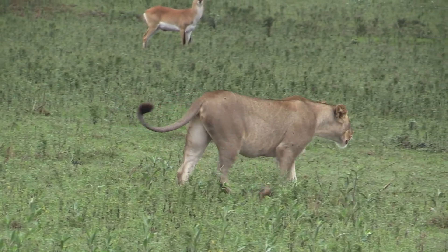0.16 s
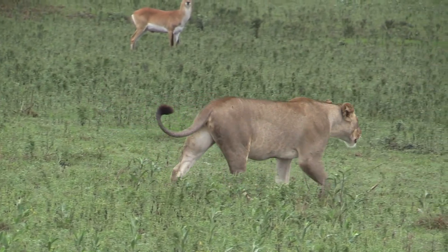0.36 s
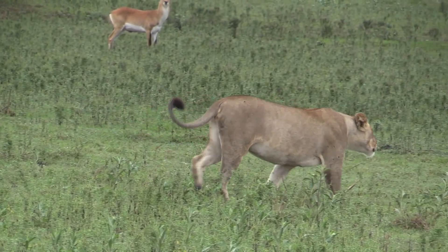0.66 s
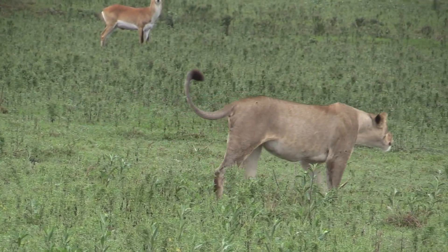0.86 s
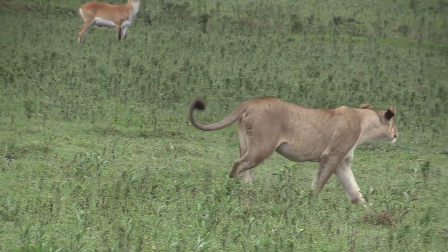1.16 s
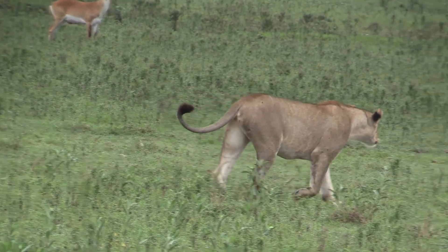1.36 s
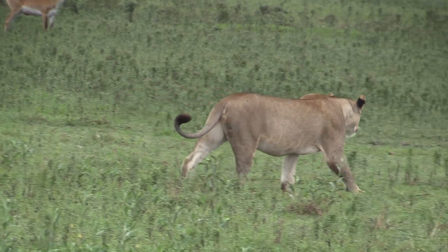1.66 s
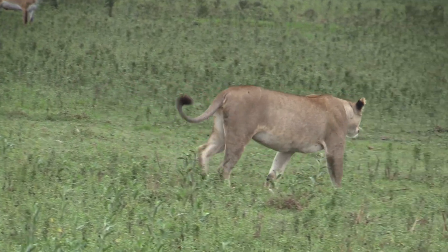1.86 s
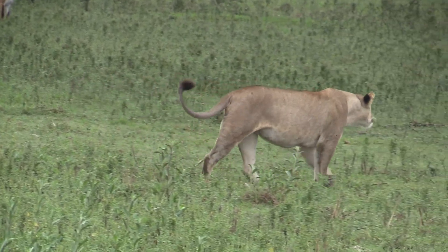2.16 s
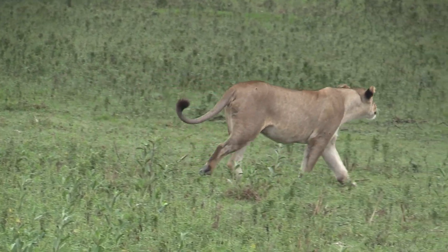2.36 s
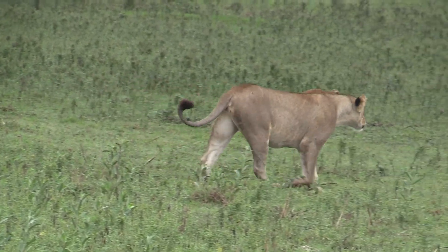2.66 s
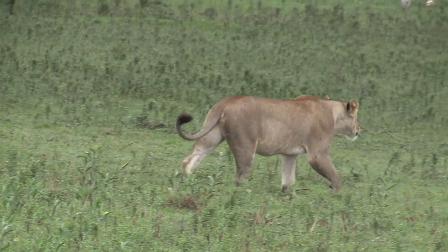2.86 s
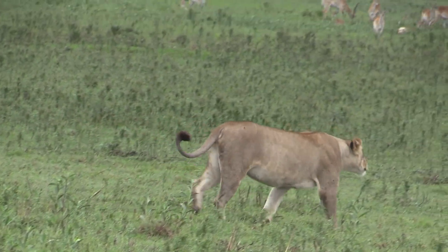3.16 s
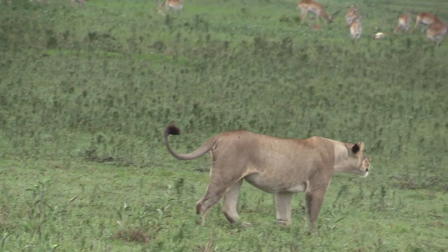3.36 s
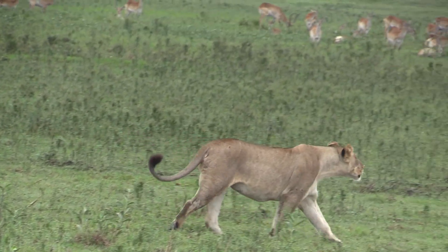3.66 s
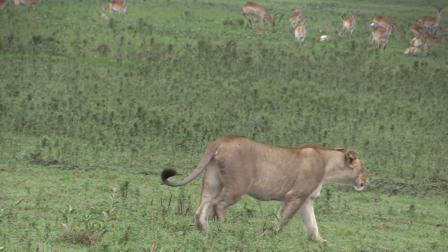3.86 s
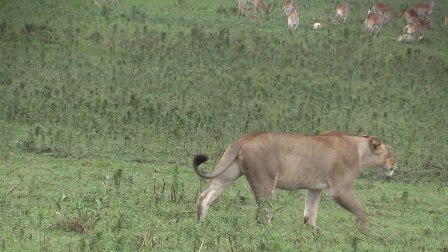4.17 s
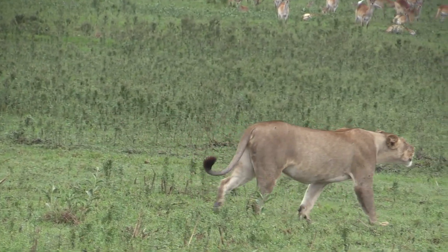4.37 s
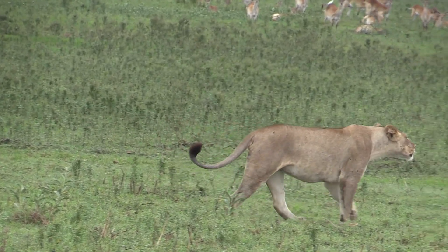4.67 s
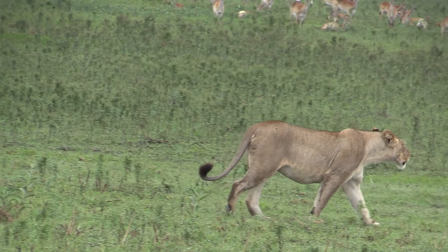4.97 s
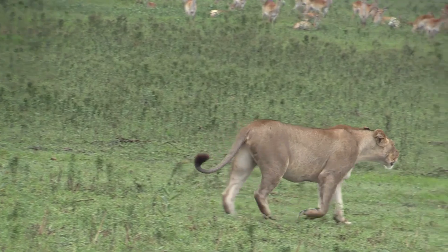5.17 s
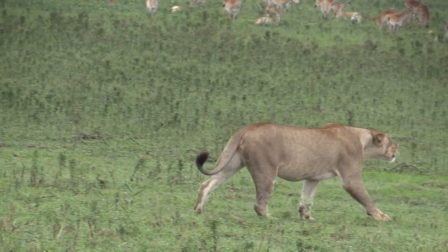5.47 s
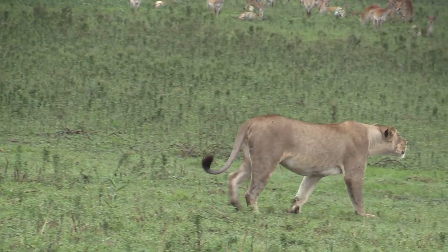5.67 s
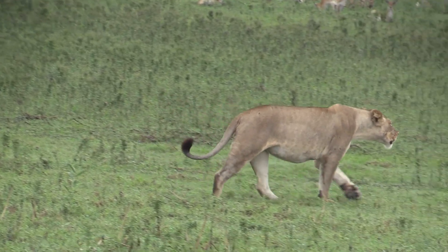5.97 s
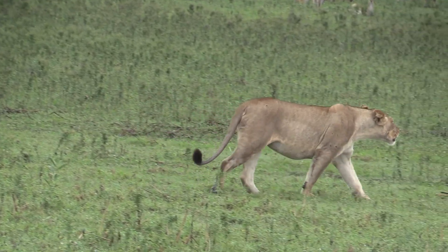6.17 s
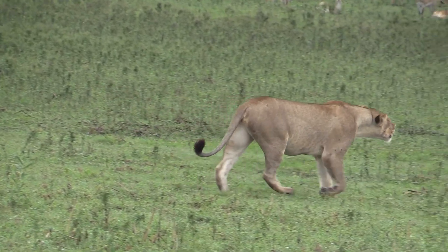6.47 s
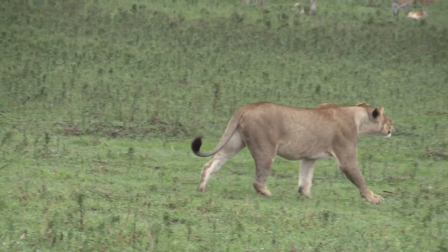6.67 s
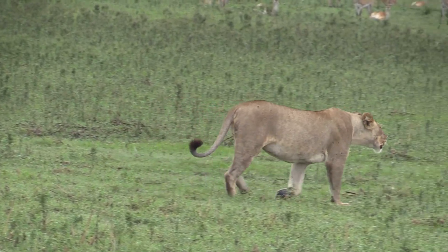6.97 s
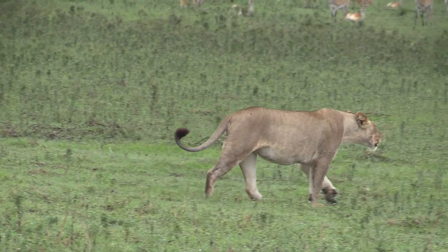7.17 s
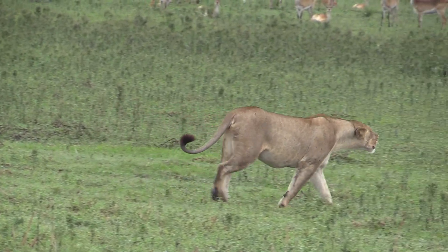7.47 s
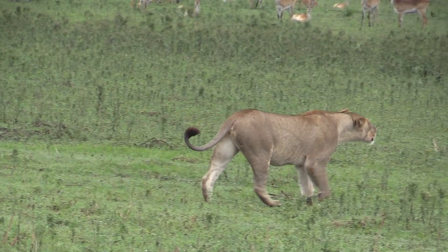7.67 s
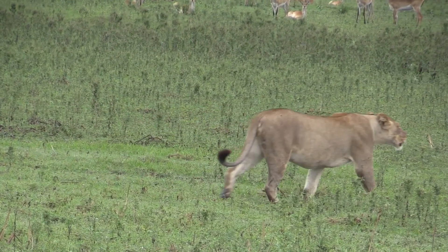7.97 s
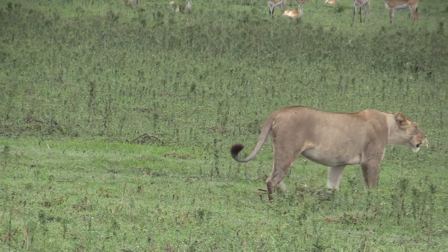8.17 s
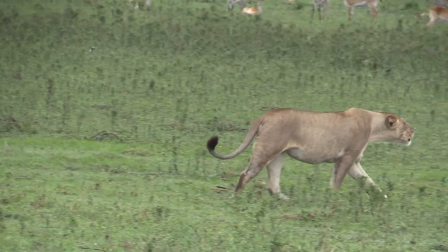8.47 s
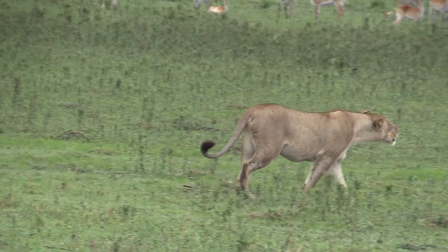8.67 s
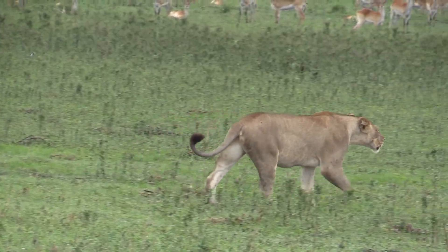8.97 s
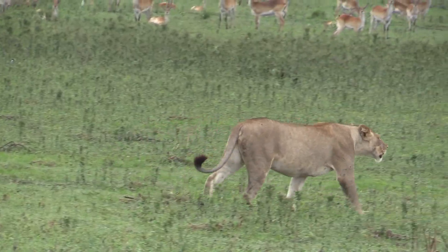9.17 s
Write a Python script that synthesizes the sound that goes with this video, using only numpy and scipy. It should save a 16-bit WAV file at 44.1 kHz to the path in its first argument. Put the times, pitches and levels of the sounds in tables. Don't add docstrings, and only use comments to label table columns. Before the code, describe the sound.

Low, rasping lion grunts repeat steadily outdoors, each humming back from the plain over soft air murmur, small knocks and faint insects.

```python
import sys
import numpy as np
from scipy import signal
from scipy.fft import rfft, irfft, next_fast_len
from scipy.io import wavfile
from scipy.ndimage import uniform_filter1d

SR = 44100
rng = np.random.default_rng(int(sys.argv[2]) if len(sys.argv) > 2 else 0)


def makeup_ratio(level_db):
    decades = np.asarray(level_db, float) / 20
    return 10 ** decades


def inscribe(sig):
    pcm = np.round(np.clip(np.atleast_2d(sig).T, -1, 1) * 32767)
    wavfile.write(sys.argv[1], SR, pcm.astype(np.int16))


N = 411453


def evened(x):
    return x / np.sqrt(np.mean(x ** 2) + 1e-20)


def read(points, hz):
    f, value = np.transpose(points)
    return np.interp(np.log(hz + 1), np.log(f + 1), value)


def follow(rows, t):
    s, *columns = np.transpose(rows)
    return [uniform_filter1d(np.interp(t, s, c), 500, mode="nearest") for c in columns]


def add(mix, s, sound):
    part = mix[..., round(s * SR):][..., :sound.shape[-1]]
    part += sound[..., :part.shape[-1]]


def panned(x, db):
    return x * makeup_ratio(np.array([[db / 2], [-db / 2]]))


def drift(n, hz):
    return evened(signal.lfilter(*signal.butter(2, hz, fs=SR), rng.standard_normal(n)))


def resonate(x, hz, width):
    r = np.exp(-np.pi * width / SR)
    poles = [1, -2 * r * np.cos(2 * np.pi * hz / SR), r * r]
    return signal.lfilter([(1 - r * r) / 2, 0, (r * r - 1) / 2], poles, x)


def tract(x, modes):
    total = 0
    for k, (hz, width, db) in enumerate(modes):
        ring = resonate(resonate(x, hz, 1.9 * width), hz, 1.9 * width)
        total = total + (-1) ** k * makeup_ratio(db) / np.sqrt(width) * ring
    return evened(total)


def stretched(x, modes, factor):
    clock = np.cumsum(factor)
    even = np.arange(clock[-1])
    return np.interp(clock, even, tract(np.interp(even, clock, x), modes))


def lion():
    # voice catches in seconds, full hum in dB, pitch in Hz, effort fails after seconds,
    # air is spent after seconds.
    voices = [
        (0.994, -16, 158.5, .242, 0.42),
        (2.286, -16.5, 156.5, .17, 0.41),
        (3.376, -15, 157, .125, 0.35),
        (4.469, -14, 158.4, .115, 0.31),
        (5.571, -14, 153.3, .095, 0.32),
        (6.544, -15.5, 153.7, .155, .31),
        (7.579, -13.5, 153.6, .12, 0.28),
        (8.641, -15, 152.2, .105, 0.31),
    ]
    # first air before the catch in seconds, first puff under full hum in dB, throat breath in dB,
    # mouth hiss in dB, breath thins after seconds.
    breaths = [(0.089, -5.5, -44, -57.5, 0.33), (0.08, -5.5, -44.5, -59, 0.29), (0.056, -7, -44, -54, 0.26),
               (0.063, -9, -42, -51, 0.24), (0.06, -12, -43, -53, .23), (0.061, -8.5, -46.5, -54.5, 0.24),
               (0.055, -10.5, -44, -54.5, 0.22), (.066, -10.5, -43.5, -52.5, 0.21)]
    # puff pitch off the hum in Hz, part of a cycle slipped at the catch, swell in seconds,
    # early hiss under its peak in dB, folds stumble this many seconds after effort fails.
    slips = [(4, .33, 0.062, -1.5, .045), (2, .4, .066, -4, .04), (-3, -.38, .078, -9.5, .062),
             (-5, 0.36, .075, -12, 0.07), (-6, 0.468, 0.082, -7.5, .09), (-2, 0.507, 0.057, -2.5, .038),
             (-10, .55, .068, -5, 0.082), (-14, -.16, 0.077, -6, .04)]
    out = np.zeros(N)
    for voice, air_row, slip in zip(voices, breaths, slips):
        add(out, *grunt(*voice, *air_row, *slip))
    return out


def grunt(catch, full_db, pitch_hz, fails, spent, lead, puff_db, rasp_db, hiss_db, thins,
          onset_hz, catch_turn, swell_s, early_db, stumble):
    t = np.arange(-.13, .52, 1 / SR)
    rise, full = -.55 * lead, -.2 * lead
    gone_db, release_s = -57, .031
    effort = [(-lead - .01, gone_db, onset_hz), (-lead, puff_db - 29, onset_hz),
              (rise, puff_db - 6, onset_hz),
              (full, puff_db, onset_hz + 9),
              (0, puff_db - 2.5, .4 * onset_hz),
              (swell_s, 0, 0), (fails, -1, 0),
              (spent, -30, -9), (spent + release_s, gone_db, -9)]
    hum_db, bend_hz = follow(effort, t)
    hum_db = hum_db + full_db
    turns = np.cumsum((pitch_hz + bend_hz) * (1 + .01 * drift(len(t), 40))) / SR
    slipped = fold_slips(t, catch_turn, fails + stumble, spent)
    memory = signal.windows.hann(round(0.034 * SR))
    beat = signal.oaconvolve(np.exp(2j * np.pi * slipped), memory / memory.sum(), "same")

    breath_db, bright_db = breath_levels(t, lead, rise, thins, fails, early_db, release_s)
    voice = makeup_ratio(hum_db) * throat_hum(t, turns, slipped, beat, fails)
    voice += rasping_breath(turns, slipped, beat, hum_db, rasp_db + breath_db, hiss_db + bright_db)
    return catch + t[0], voice * signal.windows.tukey(len(t), .08)


def fold_slips(t, catch_turn, stumbles, spent):
    gap, size, way = rng.random((12, 3)).T
    at = stumbles + .024 * np.cumsum((.6 + .8 * gap) * (np.arange(12) > 0))
    turn = .4 * (.6 + 0.76 * size) * np.sign(way - .45) * (at < spent + .02)
    return catch_turn * (t > 0) + turn @ (t > at[:, None])


def throat_hum(t, turns, slipped, beat, fails):
    overtones = [(2, -41), (3, -35.5)]
    hum = np.sqrt(2) * (beat * np.exp(2j * np.pi * turns)).real
    for k, db in overtones:
        hum += makeup_ratio(db) * np.cos(2 * np.pi * k * (turns + slipped)) * makeup_ratio(0.5 * drift(len(t), 30))
    kicks = abs(np.diff(slipped, prepend=slipped[0])) * (t > fails)
    return hum + makeup_ratio(42) * resonate(resonate(kicks, 95, 60), 95, 90)


def breath_levels(t, lead, rise, thins, fails, early_db, release_s):
    rasp_stages = (-25.5, -12, -2, -5, -25.5)
    hiss_stages = (-27.5, -19, -4, -21.5)
    first, puff, swell, cut, out = zip(rasp_stages, np.insert(hiss_stages, 2, early_db))
    stop = thins + 0.078
    stages = [(-lead - .015, -50, -50), (-lead, *first), (rise, *puff), (.03, *swell),
              (thins, *cut), (stop, *out), (stop + release_s, -45, -45)]
    rasp = follow(sorted(stages + [(fails + 0.049, 0, 0)]), t)[0]
    hiss = follow(sorted(stages + [(fails + 0.02, 0, 0)]), t)[1]
    return rasp, hiss


def rasping_breath(turns, slipped, beat, hum_db, breath_db, bright_db):
    # resonance in Hz, width in Hz, level in dB.
    throat = [(269, 73, -1), (438, 38, -1.5), (548, 25, -5.5), (703, 72, -5), (902, 55, -8.5),
              (1063, 53, -3), (1162, 80, -10.5), (1347, 130, -3), (1000, 740, -6.5)]
    chest = [(129, 43, -5.5), (183.7, 57, 3), (219.3, 67.7, -3)]
    mouth = [(1616, 97, 1.5), (1900, 220, 4.5), (2050, 87, 4.5), (2310, 110, 3), (2728, 260, 3),
             (2985, 130, 0.5), (3130, 150, -7), (3490, 390, -1.5), (4100, 310, -3), (5050, 300, -3.5),
             (5700, 410, -9), (7360, 1700, -8.5)]
    n = len(turns)
    strong_weak = 1 + 0.41 * np.cos(np.pi * turns)
    spurt_db = 5 * (1 - abs(beat))
    puffs = (0.58 + np.exp(-(turns % 1) / 0.047) * strong_weak) * rng.standard_normal(n)
    puffs *= makeup_ratio(1.5 * drift(n, 49) + spurt_db)
    snaps = sum(np.cos(2 * np.pi * k * (turns + slipped)) for k in range(4, 12))

    opening = 1.02 + .0045 * np.clip(hum_db - hum_db.max(), -30, 0)
    low = stretched(evened(puffs) + 0.079 * evened(snaps), throat, opening) * makeup_ratio(breath_db)
    slack_db = 0.2 * np.clip(np.maximum.accumulate(hum_db) - hum_db, 0, 20)
    sag = 0.041 * slack_db
    low += stretched(rng.standard_normal(n), chest, 1 - sag) * makeup_ratio(breath_db + 10.5 + slack_db)
    low = signal.lfilter(*signal.butter(3, 110, "high", fs=SR), low)
    tongue = 1 + .025 * drift(n, 3)
    return low + stretched(puffs, mouth, tongue) * makeup_ratio(bright_db + 4)


def echo():
    # time in seconds, peak level in dB.
    returns = [(.086, -50.5), (.22, -58), (.4, -62.5), (.6, -65), (.82, -69.5), (1.53, -59), (1.608, -61.5),
               (1.8, -61.5), (1.95, -62.5), (2.819, -64), (3.028, -59.5), (3.78, -51.5), (4.082, -65),
               (4.262, -64), (4.81, -52), (5.1, -62), (5.25, -63.5), (5.36, -68.5), (6.148, -66),
               (6.361, -72), (6.93, -58), (7.08, -62), (7.242, -59), (7.47, -62), (7.964, -52), (8.33, -60),
               (8.41, -67.5), (9.15, -65), (9.29, -68)]
    s, db = np.transpose(returns)
    late = np.arange(0, N + 256, 256)[:, None] / SR - s
    power = makeup_ratio(db + np.minimum(217.5 * late, -110.5 * late)) ** 2
    level = np.interp(np.arange(N) / 256, np.arange(len(late)), np.sqrt(power.sum(1)))
    note = np.sqrt(2) * np.sin(2 * np.pi * np.cumsum(155 + 4 * drift(N, 12.1)) / SR)
    smear = evened(resonate(resonate(rng.standard_normal(N), 170, 25), 170, 40))
    return level * (note + 0.18 * smear)


def ground(x):
    t = np.arange(round(.12 * SR)) / SR
    sparse = rng.random((2, len(t))) < .05
    taps = rng.choice([-1., 1.], (2, len(t))) * sparse * makeup_ratio(-60 * t / 0.047) * (t > .002)
    taps = signal.lfilter(*signal.butter(4, 400, "high", fs=SR), taps)
    return signal.fftconvolve(x[None], taps / np.linalg.norm(taps[0]), axes=1)[:, :N]


def knocks():
    # time in seconds, peak in dB, contact in seconds, first snap in dB, left over right in dB.
    hits = [
        (2.2325, -31, 0.0015, -20, 3.5),
        (5.7755, -30.5, 0.0012, -26, 5.5),
        (7.0584, -37.5, 0.00092, -27, 3.5),
        (7.286, -35.5, 0.0016, -13.5, -7.5),
        (9.127, -42, 0.001, -30, 2),
    ]
    # ring in Hz, width in Hz, level in dB.
    hit_rings = [
        [(1050, 150, 4.5), (1680, 200, 5), (2950, 66, -5), (4330, 110, -11.5), (4940, 100, -16.5),
         (6300, 74, -23)],
        [(1520, 410, 17), (2230, 440, -9), (10100, 900, -13)],
        [(1100, 57, -5), (1580, 95, -3.5), (1860, 150, -4.5), (2540, 73, -17), (2850, 190, -15)],
        [(1750, 83, 10.5), (2740, 100, -3), (6060, 120, -9), (6900, 87, -6), (8520, 230, -21), (10200, 83, -27),
         (11000, 100, -29)],
        [(1090, 95, -1), (1600, 130, 4), (2760, 120, -6), (3470, 260, -20)],
    ]
    # time in seconds, peak in dB, ring in Hz, 60 dB decay in seconds, left over right in dB.
    soft_taps = [
        (1.967, -48, 1000, 0.028, -4),
        (3.868, -43.5, 698, 0.025, 1),
        (6.969, -47, 690, 0.0091, 3),
        (8.153, -49.5, 657, 0.013, 10),
        (8.9, -46, 930, 0.013, 0.83),
    ]
    out, t = np.zeros((2, N)), np.arange(round(.08 * SR)) / SR
    for (s, db, contact, snap_db, pan_db), rings in zip(hits, hit_rings):
        blow = np.minimum(t / contact, 1) * np.exp(-t / contact) + 0.043 * np.exp(-t / 0.0049)
        damped = [(hz, width + 250, ring_db) for hz, width, ring_db in rings]
        ring = tract(blow * rng.standard_normal(len(t)), damped)
        snap = resonate(np.exp(-t / contact) * rng.standard_normal(len(t)), 5500, 9000)
        add(out, s - .001, panned(makeup_ratio(db + snap_db + 7.5) * snap / abs(snap).max(), pan_db))
        add(out, s, panned(makeup_ratio(db) * ring / abs(ring).max(), pan_db))
    for s, db, hz, t60, pan_db in soft_taps:
        blow = np.minimum(t / 0.0013, 1) * np.exp(-t / 0.00068) * rng.standard_normal(len(t))
        ring = resonate(resonate(blow, hz, 1.8 / t60), hz, 1.6 * hz)
        ring += 0.27 * resonate(blow, 0.82 * hz, hz)
        add(out, s, panned(makeup_ratio(db) * ring / abs(ring).max(), pan_db))
    return out


def croak():
    croak_shape = (5.236, 5.37, 76, 560, 160)
    start, end, rate, hz, width = croak_shape
    t = np.arange(0, end - start, 1 / SR)
    cycles = np.cumsum(rate * (1 + 0.047 * drift(len(t), 40))) / SR
    pulses = np.diff(np.floor(cycles + .99), prepend=0)
    pulses = pulses * np.exp(-t / 0.194) * makeup_ratio(1.8 * drift(len(t), 60))
    voice = resonate(resonate(pulses, hz, width), hz, 210) + 0.77 * resonate(pulses, 240, 90)
    out = np.zeros(N)
    add(out, start, makeup_ratio(-59.5) * evened(voice))
    return out


def cricket():
    # centre of first chirp in seconds, end in seconds, chirps a second, level in dB.
    trills = [
        (.031, 1.45, 18.67, -1),
        (1.981, 3.52, 18.71, -1),
        (4.312, 5.79, 18.8, 0),
        (6.593, 7.88, 19.05, 1),
    ]
    # wing stroke from the chirp centre in seconds, level in dB.
    strokes = [(-.010, -1), (.002, 0), (.011, -4)]
    out, t = np.zeros(N), np.arange(round(0.017 * SR)) / SR
    bell = np.sin(np.pi * np.sqrt(t / t[-1])) ** 2
    for start, end, rate, db in trills:
        for at in np.arange(start, end, 1 / rate):
            swell_db = -71 + db - 11 * np.exp(-(at - start) / .25)
            for (offset, stroke_db), (u, v) in zip(strokes, rng.standard_normal((3, 2))):
                ring = np.sin(2 * np.pi * (9000 + 60 * u - 15000 * t) * t) * bell
                add(out, at + offset - .006, makeup_ratio(swell_db + stroke_db + 1.5 * v) * ring)
    return panned(out, 1.5)


def ticks():
    # time in seconds, peak in dB, pitch in Hz, left over right in dB.
    chips = [
        (0.9613, -59, 5800, 9.5),
        (2.0344, -62, 5900, 10),
        (3.903, -60, 5660, 12),
        (4.1086, -63, 5740, 8),
    ]
    # time in seconds, peak in dB, pitch in Hz, 60 dB decay in seconds, left over right in dB.
    peeps = [
        (0.8365, -56, 1730, 0.035, 1.4),
        (0.9023, -51, 1520, 0.04, -1.3),
        (8.9, -53, 1680, 0.035, 1.5),
        (8.9336, -51, 1680, 0.035, 1.5),
    ]
    out, t = np.zeros((2, N)), np.arange(round(.006 * SR)) / SR
    for s, db, hz, pan_db in chips:
        chip = np.sin(2 * np.pi * hz * t) + np.sin(2 * np.pi * 1.15 * hz * t)
        add(out, s, panned(makeup_ratio(db - 0.5) * chip * signal.windows.hann(len(t)), pan_db))
    t = np.arange(round(.06 * SR)) / SR
    for s, db, hz, t60, pan_db in peeps:
        peep = np.sin(2 * np.pi * hz * t) * np.minimum(t / 0.001, 1) * makeup_ratio(-60 * t / t60)
        add(out, s, panned(makeup_ratio(db) * peep, pan_db))
    return out


def air():
    # frequency in Hz, level in dB per Hz.
    air_colour = [(15, -59), (25, -38.5), (59, -10.5), (127, -18), (161, -4.5), (217, -16), (317, -14),
                  (344, -13), (373, -16), (677, -14), (734, -15), (1020, -15.5), (1290, -17), (6050, -28.5),
                  (16000, -42.5)]
    # frequency in Hz, left-right likeness from -1 to 1.
    likeness = [(60, 0.015), (130, 1), (290, 0.26), (640, -0.11), (1410, -0.26), (3100, 0.4), (6820, 0.62),
                (15000, 0.68)]
    frames, hz = N // 256 + 5, np.fft.rfftfreq(1024, 1 / SR)
    a, b, c, d, patches = rng.standard_normal((frames, 513, 5)).T
    patches = evened(uniform_filter1d(uniform_filter1d(patches, 14, 0), 20, 1))
    same = np.clip(read(likeness, hz), -1, 1)[:, None]
    left, other = a + 1j * b, c + 1j * d
    z = np.array([left, same * left + np.sqrt(1 - same ** 2) * other])
    hollow_db = 4 * np.exp(-((hz - 650) / 60) ** 2) + 3 * np.exp(-((hz - 1220) / 70) ** 2)
    z *= makeup_ratio((read(air_colour, hz) + hollow_db)[:, None] + 1.4 * patches)
    murmur = signal.istft(z, nperseg=1024, noverlap=768)[1][:, :N]
    return makeup_ratio(-61.5 + 2.5) * evened(murmur)


def scene():
    roar, near = lion(), knocks()
    scatter = makeup_ratio(-7) * ground(roar + near.mean(0))
    return roar + echo() + scatter + near + croak() + cricket() + ticks() + air()


def band_limit(x):
    return signal.sosfilt(signal.butter(12, 16380, fs=SR, output="sos"), x)


def record(dry):
    # frequency in Hz, left over right in dB.
    port_colour = [(60, 0.5), (130, 0.5), (290, 1.0), (640, 4.0), (1410, 3.0), (3100, 0.5), (6820, 1.0),
                   (15000, 1.0)]
    n = next_fast_len(N)
    hz = np.fft.rfftfreq(n, 1 / SR)
    lead = .15 * np.cos(np.pi * np.clip(hz / 2200, 0, 1)) * (hz < 5000) * np.exp(-hz / 6000)
    half = makeup_ratio(read(port_colour, hz) / 2) * np.exp(.5j * lead)
    edge = np.clip((16000 - hz) / 500, .1, 1) * (hz < 16380)
    mix = irfft(rfft(dry, n) * edge * np.array([half, 1 / half]), n)[:, :N]
    return band_limit(mix)


dry = scene()
out = record(dry)
inscribe(out)
```